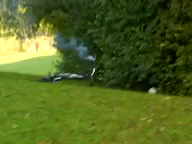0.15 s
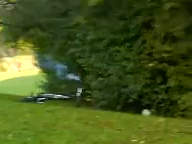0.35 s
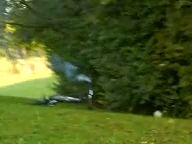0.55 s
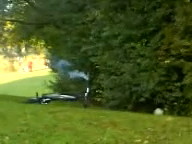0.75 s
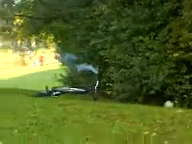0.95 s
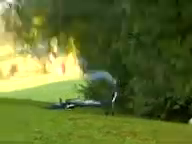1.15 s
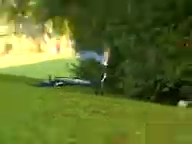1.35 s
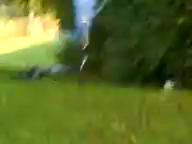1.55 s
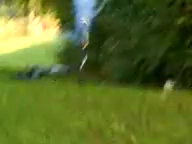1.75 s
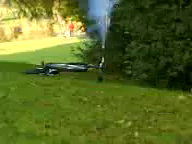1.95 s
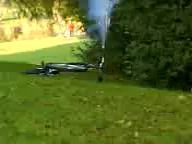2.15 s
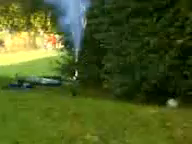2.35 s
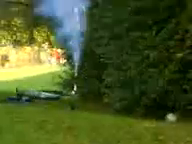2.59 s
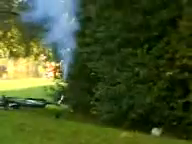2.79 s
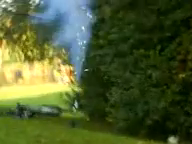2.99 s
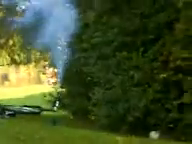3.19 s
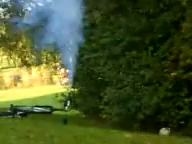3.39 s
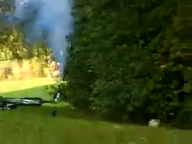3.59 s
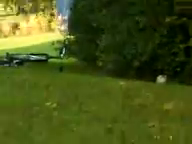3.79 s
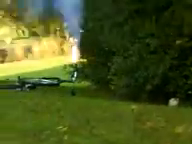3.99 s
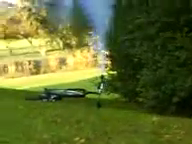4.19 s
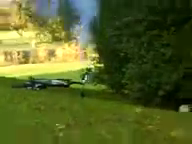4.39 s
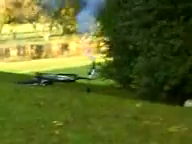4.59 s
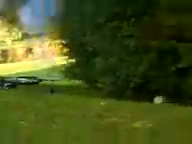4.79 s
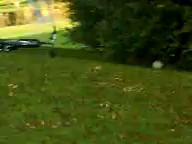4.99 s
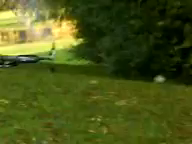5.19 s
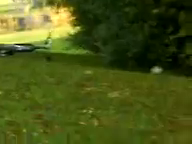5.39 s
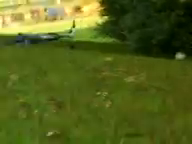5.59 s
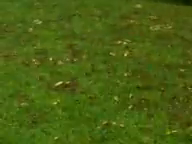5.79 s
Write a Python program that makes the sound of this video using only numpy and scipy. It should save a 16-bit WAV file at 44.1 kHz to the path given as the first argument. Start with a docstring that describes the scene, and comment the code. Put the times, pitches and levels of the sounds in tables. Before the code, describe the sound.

Outdoors on grass beside dense bushes, near-silence gives way to a shrill firework whistle that flutters and drops steadily for two and a half seconds over a hiss of gas. It dies abruptly. Less than a second later comes a hard, clipped bang with a short leafy crash and low boom, then a weak crack, a stronger one at the very end, and faint echo from far trees, through a cheap muffled microphone.

```python
"""A faint open-air wash and a light scuff come first, then a whistling firework shrieks for two and a half seconds.
A tube-like tone with an octave, a second tone and a rush of gas sputters and sinks in pitch as the fuel burns.
After a pause it bursts as a shock, a low thump and dense foliage scatter; two smaller cracks follow.
A hedge scatters the whistle and distant trees echo it and the main bang.
A narrow-band microphone and an overloaded input flatten the loudest peaks."""
import sys
import numpy as np
from scipy import signal
from scipy.fft import rfft, irfft, next_fast_len
from scipy.io import wavfile
from scipy.ndimage import uniform_filter1d, map_coordinates

SR = 44100
rng = np.random.default_rng(int(sys.argv[2]) if len(sys.argv) > 2 else 0)


def dump(signal):
    """Clip the signal to [-1, 1] and save it as 16-bit WAV at the path in sys.argv[1]."""
    limited = np.clip(np.atleast_2d(signal).T, -1, 1)
    pcm = np.round(limited * 32767).astype(np.int16)
    wavfile.write(sys.argv[1], SR, pcm)


N = 257588
T = np.arange(N) / SR  # time in seconds

IGNITION_S, BURNOUT_S = 1.529, 4.0806  # the whistle charge burns between these times
YELP_ROUGH, YELP_ROUGH_S = 0.3, 0.036  # added roughness at ignition, decay time
SQUEAK_HZ, SQUEAK_S, SQUEAK_ROUGH = 560, 0.034, 0.5  # rough upward squeak as the last fuel goes
OCTAVE_DB, OCTAVE_GROWTH_DB_PER_S = -14, 22.5  # octave at burnout; it grows as the tube empties
# The burn. Each row: time in seconds, strength of the tone in dB, basic roughness from 0 to 1.
BURN = [(1.53, -2.5, 0.18), (1.8, -1.5, 0.13), (2.3, -2, 0.22), (2.58, -1.53, 0.06), (2.7, -3.5, 0.26),
        (2.9, -1.62, .18), (3.15, -4.5, 0.24), (3.57, -3.5, .25), (3.66, -1.5, 0.13), (3.72, -5, 0.23),
        (3.93, -6.5, 0.28), (4.04, -4.5, .14)]
# Fast flutters of the flame. Each row: centre in seconds, half length in seconds, rate in Hz, depth from 0 to 1.
FLUTTERS = [(1.613, 0.022, 725, 0.32), (2.588, .04, 365, 0.39)]


def whistle(jitter=0.035, tremble=0.52, grit=0.43, octave_flicker_db=3.5, rebound_hz=45):
    """The flame pulses at the quarter-wave pitch of a tube that grows longer as it empties."""
    tone_db, rough = curves(BURN)
    dying = since(BURNOUT_S) / SQUEAK_S
    spent = np.minimum(2 * dying, 1)
    squeak = SQUEAK_HZ * dying ** 2 * (dying < 1)
    pitch = tube_hz() + rebound_hz * spent + squeak
    rough = rough + YELP_ROUGH * np.exp(-since(IGNITION_S) / YELP_ROUGH_S)
    rough = rough + SQUEAK_ROUGH * spent * np.exp(-dying / 2)
    sputter_db = sputter(rough)

    # a rough burn shakes both pitch and strength, which puts a noisy skirt on the tone
    shake = jitter * rough * (wobble(90) + 3 * rough * wobble(400))
    phase = 2 * np.pi * np.cumsum(pitch * (1 + shake)) / SR
    phase = phase + grit * rough * wobble(800)
    flutter = np.zeros(N)
    for centre, width, hz, depth in FLUTTERS:
        flutter += depth * np.exp(-((T - centre) / width) ** 4) * np.sin(2 * np.pi * hz * T)
    size = amp(sputter_db) * (1 + flutter + tremble * rough * wobble(140) + grit * rough * wobble(800))

    octave_db = OCTAVE_DB - OCTAVE_GROWTH_DB_PER_S * np.maximum(BURNOUT_S - T, 0)
    octave_db = octave_db + octave_flicker_db * wobble(45)
    octave = amp(octave_db) * np.sin(2 * phase + 2 * rough * wobble(170))
    main = size * (np.sin(phase) + octave)
    return flame() * amp(tone_db) * (main + second_tone(phase, tube_hz(), sputter_db))


PITCH_HZ, SAG_HZ_PER_S = 2093, 182  # the underlying pitch sinks steadily as the tube empties
SETTLE_HZ, SETTLE_S = 134.8, 0.33  # it starts sharp and settles
YELP_HZ, YELP_S = 195, 0.03  # a brief yelp at ignition


def tube_hz():
    """The resonance of the tube, sinking as the fuel burns down."""
    age = np.minimum(since(IGNITION_S), BURNOUT_S - IGNITION_S)
    settle = SETTLE_HZ * np.exp(-age / SETTLE_S)
    yelp = YELP_HZ * np.exp(-(age / YELP_S) ** 2)
    return PITCH_HZ - SAG_HZ_PER_S * age + settle + yelp


ATTACK_S, RELEASE_DB_PER_S, DEAD_S = 0.0071, 231, 4.21  # it catches at once, dies away and is out


def flame():
    """Gain of the burn: a quick attack, a hold, and a release after burnout."""
    alight = np.minimum(since(IGNITION_S) / ATTACK_S, 1) * np.exp(-since(DEAD_S) / ATTACK_S)
    return alight * amp(-RELEASE_DB_PER_S * since(BURNOUT_S))


# Dips where the flame falters. Each row: centre in seconds, depth in dB, half length in seconds.
SPUTTERS = [(1.634, -13.5, 0.007), (1.697, -7.5, .008), (1.794, -4.5, 0.013), (1.903, -4, .01),
            (2.072, -14, .007), (2.136, -8.5, 0.0041), (2.266, -6.5, 0.0081), (2.318, -31, 0.0036),
            (2.485, -9, 0.0078), (2.638, -8.5, 0.0076), (2.732, -11.5, 0.012), (2.936, -4, 0.023),
            (3.006, -9, 0.02), (3.264, -8, .006), (3.527, -7.5, .018), (3.57, -20.5, .005),
            (3.725, -6.5, 0.01), (3.897, -9, 0.0088)]


def sputter(rough, catch_db=22):
    """Level change in dB from the big sputters and from many tiny catches of the flame."""
    big = sum(depth * np.exp(-((T - s) / width) ** 2) for s, depth, width in SPUTTERS)
    return big - catch_db * rough * np.maximum(wobble(130) - 0.5, 0) ** 2


WAVER, WAVER_END = 0.3, 1.1  # unsteadiness of the second tone at ignition and at burnout
# A second tone about a fifth above. Each row: time in seconds, pitch ratio to the main tone,
# basic level in dB against the main tone.
SECOND = [(1.55, 1.45, -31.5), (1.63, 1.51, -18.5), (2.0, 1.51, -31), (2.55, 1.43, -29.5),
          (2.75, 1.38, -22.5), (3.02, 1.41, -23), (3.24, 1.5, -18), (3.5, 1.47, -18.5), (4.08, 1.44, -18.5)]


def second_tone(phase, pitch, sputter_db, wander=0.008, swell_db=7, flicker_db=3.5,
                under_slope_db=-20, fast=0.94, slow=1.5):
    """An unsteady tone swells when the main one falters; when steady it adds a combination tone below."""
    ratio, level_db = curves(SECOND)
    waver = np.interp(T, [IGNITION_S, BURNOUT_S], [WAVER, WAVER_END])
    over = 2 * np.pi * np.cumsum(pitch * (ratio + wander * waver * wobble(20))) / SR
    over = over + waver * (fast * wobble(240) + slow * wobble(50))
    gain = amp(level_db + swell_db * (1 - amp(sputter_db)) + flicker_db * wobble(70))
    under = amp(under_slope_db * waver) * np.sin(2 * phase - over)
    return gain * (np.sin(over) + under)


JET_DB, JET_FADE_DB_PER_S = -22.5, 0.73  # rush of gas
JET_SURGE_DB, JET_SURGE_S = 3, 0.052  # its extra level at ignition, decay time
# Tone of the rushing gas. Each row: frequency in Hz, relative spectral density in dB per Hz.
JET_COLOUR = [(25, -30.5), (150, -15), (400, -8.5), (700, -2.5), (1000, -4.5), (1250, -5), (1600, 6.5),
              (2100, 7.5), (2600, 2.5), (3300, -4.5), (5000, -16.5)]


def jet(gust_db=1.33, patchy_db=3.0):
    """Turbulent gas rushes from the mouth of the tube, in patches of passing colour."""
    spectrum = signal.stft(noise(JET_COLOUR), nperseg=512)[2]
    # smooth random gains over frequency, then over time
    patches = uniform_filter1d(rng.standard_normal(spectrum.shape), size=3, axis=0)
    patches = uniform_filter1d(patches, size=9, axis=1)
    rush = signal.istft(spectrum * amp(patchy_db * unit(patches)), nperseg=512)[1][:N]
    age = since(IGNITION_S)
    level_db = JET_DB - JET_FADE_DB_PER_S * age + JET_SURGE_DB * np.exp(-age / JET_SURGE_S)
    return flame() * amp(level_db + gust_db * wobble(45)) * unit(rush)


# The bursts, the main one first. Each row: start in seconds, direct crack in dB, foliage scatter in dB.
REPORTS = [(4.8584, -0.5, 3.5), (5.4317, -14, -38.5), (5.743, -7.5, -36)]
# Tone of a direct crack. Each row: frequency in Hz, relative gain in dB.
SHOCK = [(60, -13.5), (250, -23.5), (600, -3), (1000, 10.5), (1500, -6.5), (2100, 6), (2600, -23),
         (3300, -27.5), (4500, -43.5)]
# Tone of the scattered blast. Each row: frequency in Hz, relative spectral density in dB per Hz.
BLAST = [(25, -24), (70, -22), (160, -13), (300, -13), (700, -0.5), (1300, 2.5), (2000, 7.5), (2600, -1.5),
         (3400, -7.5), (5000, -27.5)]


def reports(ground_s=0.001, ground=0.47, lumps_db=1.43):
    """Each burst sends a shock, its bounce off the lawn and a dense scatter from the foliage."""
    out = np.zeros(N)
    for s, crack_db, scatter_db in REPORTS:
        arrivals = [round(s * SR), round((s + ground_s) * SR)]
        shock = coloured(np.bincount(arrivals, [-1, ground], N), SHOCK)
        out += amp(crack_db) * shock / np.abs(shock).max()
        out += scatter(s) * amp(scatter_db + lumps_db * wobble(150)) * noise(BLAST)
    return out


SCATTER_RISE_S, SCATTER_HOLD_S, SCATTER_T60 = 0.013, 0.024, 0.27  # dense first answer, all in seconds
SCATTER_TAIL_DB, SCATTER_TAIL_T60 = -11, 0.61  # longer tail, T60 in seconds


def scatter(s):
    """Gain of the foliage's answer to a report at s: it builds up, holds and dies at two speeds."""
    late = since(s + SCATTER_HOLD_S)
    rise = 1 - np.exp(-(since(s - 0.003) / SCATTER_RISE_S) ** 2)  # starts 3 ms ahead of the crack
    dense = amp(-60 * late / SCATTER_T60)
    tail = amp(SCATTER_TAIL_DB - 60 * late / SCATTER_TAIL_T60)
    return rise * np.hypot(dense, tail)


THUMP_DB, THUMP_HZ, THUMP_T60 = -14.5, 175, 0.18  # T60 in seconds


def thump(rise_s=0.003):
    """The main burst shoves the air: a low, quickly dying boom."""
    age = since(REPORTS[0][0])
    colour = [(THUMP_HZ / 4, -12), (THUMP_HZ, 0), (2 * THUMP_HZ, -12), (10 * THUMP_HZ, -50)]  # (Hz, dB)
    return (1 - np.exp(-age / rise_s)) * amp(THUMP_DB - 60 * age / THUMP_T60) * noise(colour)


# Hedge reflections. Each row: delay in seconds, spread in seconds, relative level in dB.
HEDGE = [(0.051, 0.046, -3.5), (0.162, 0.076, -29.5)]
# Distant tree reflections. Each row: delay in seconds, spread in seconds, relative level in dB.
TREES = [(0.551, .2, -7.5), (.95, 0.14, -4.5)]
# Air and leaves dull the distant echo. Each row: frequency in Hz, gain in dB.
FAR_COLOUR = [(100, -7.5), (700, 0.5), (1700, 3), (2400, -9.5), (3300, -8), (5000, -27)]


def surroundings(x, hedge_db=-18, trees_db=-44.5):
    """The hedge answers almost at once, the distant trees in a blur around half a second and later."""
    hedge = amp(hedge_db) * echo(x, HEDGE)
    trees = amp(trees_db) * coloured(echo(x, TREES), FAR_COLOUR)
    return x + hedge + trees


def echo(x, reflectors):
    """Foliage scatters sound: each reflector returns a random cloud of arrivals."""
    t = T[T < 1.3]
    density = sum(amp(db) * np.exp(-((t - delay) / spread) ** 2) for delay, spread, db in reflectors)
    tail = density * rng.standard_normal(len(t))
    return signal.fftconvolve(x, tail / np.linalg.norm(tail))[:N]


def far_echo(delay_s=0.585, echo_db=-37, rise_s=0.0037, t60=0.91):
    """The main bang returns from the distant trees as a swell of noise that dies away."""
    t = T - REPORTS[0][0] - delay_s
    swell = np.exp(np.minimum(t, 0) / rise_s) * amp(-60 * np.maximum(t, 0) / t60)
    colour = [(100, -55), (700, 2.5), (1600, 4), (2300, 1.5), (3200, -17), (5000, -33.5)]  # (Hz, dB)
    return amp(echo_db) * swell * noise(colour)


# A scuff, light knocks, and the last crack's scattered answers (final three rows).
# Each row: start in seconds, level in dB, centre in Hz, T60 in seconds.
SMALL_BURSTS = [(0.254, -45.5, 1150, 0.24), (0.301, -42, 1250, 0.011), (4.19, -47, 403, .04),
                (4.433, -40.5, 629, 0.034), (4.652, -51.5, 640, 0.05), (5.405, -38, 1950, 0.02),
                (5.758, -33, 1800, 0.049), (5.789, -38, 750, 0.041), (5.833, -37.5, 810, 0.061)]


def scuffs_and_last_scatter():
    """Scuff, knocks and the last crack's scatter are short noise bursts around one pitch that decay."""
    out = np.zeros(N)
    for s, db, hz, t60 in SMALL_BURSTS:
        colour = [(hz / 8, -12), (hz, 0), (1.45 * hz, -7), (4 * hz, -40)]  # (Hz, dB)
        white = rng.standard_normal(N)
        burst = (T > s) * amp(db - 60 * np.maximum(T - s, 0) / t60) * white
        out += coloured(burst, colour) / np.std(coloured(white, colour))
    return out


# Background level. Each row: time in seconds, level in dB.
AIR = [(1.5, -60), (4.25, -65.5), (4.6, -61.5), (4.85, -54.5), (5.0, -59.5), (5.84, -55)]
# Background tone. Each row: frequency in Hz, relative spectral density in dB per Hz.
AIR_COLOUR = [(20, -42.5), (40, -16), (85, -6), (130, -8.5), (200, -10.5), (350, -15), (700, -14),
              (1200, -13.5), (1900, -19.5), (2600, -34), (3300, -27.5), (5000, -62)]


def air():
    """The faint wash of the open park: coloured noise with a slowly drifting level."""
    return amp(curves(AIR)[0] + 0.5 * wobble(6.3)) * noise(AIR_COLOUR)


def amp(db):
    """Decibels to gain."""
    return 10 ** (np.asarray(db) / 20)


def unit(x):
    """Scaled to rms 1."""
    return x / np.sqrt(np.mean(x ** 2) + 1e-20)


def since(s):
    """Seconds elapsed since s, zero before it."""
    return np.maximum(T - s, 0)


def curves(rows, t=T):
    """One value per sample for each column after the time."""
    s, *columns = np.transpose(rows)
    return [np.interp(t, s, column) for column in columns]


def wobble(rate):
    """A smooth random curve, rate knots a second."""
    return map_coordinates(rng.standard_normal(N // 8), [T * rate], mode="wrap")


def filtered(x, response):
    """The sound with its spectrum multiplied by a response of frequency."""
    m = next_fast_len(N + SR // 2)  # padding keeps the end from wrapping onto the start
    return irfft(rfft(x, m) * response(np.fft.rfftfreq(m, 1 / SR)), m)[:N]


def coloured(x, colour):
    """The sound through a (Hz, dB) response, interpolated over log frequency."""
    f, db = np.transpose(colour)
    return filtered(x, lambda hz: amp(np.interp(np.log(hz + 1), np.log(f), db)))


def noise(colour):
    """Noise of rms 1 with a (Hz, dB) spectrum."""
    return unit(coloured(rng.standard_normal(N), colour))


def scene():
    """Whistle, bursts and background at one microphone."""
    firework = surroundings(whistle() + jet()) + reports() + thump()
    return (firework + far_echo() + scuffs_and_last_scatter() + air())[None]


TOP_HZ = 16000  # nothing passes above this


def record(dry, mic_hz=3500, ceiling=0.74, hiss_db=-99, low_hz=22):
    """The microphone dulls the treble; the overloaded input flattens peaks, which adds new treble."""
    narrow = signal.sosfilt(signal.butter(11, mic_hz, fs=SR, output="sos"), dry[0])
    clipped = np.clip(narrow, -ceiling, ceiling) + amp(hiss_db) * rng.standard_normal(N)
    coupled = signal.sosfilt(signal.butter(1, low_hz, "high", fs=SR, output="sos"), clipped)
    return filtered(coupled, lambda hz: hz < TOP_HZ)[None]


dry = scene()
out = record(dry)
dump(out)
```